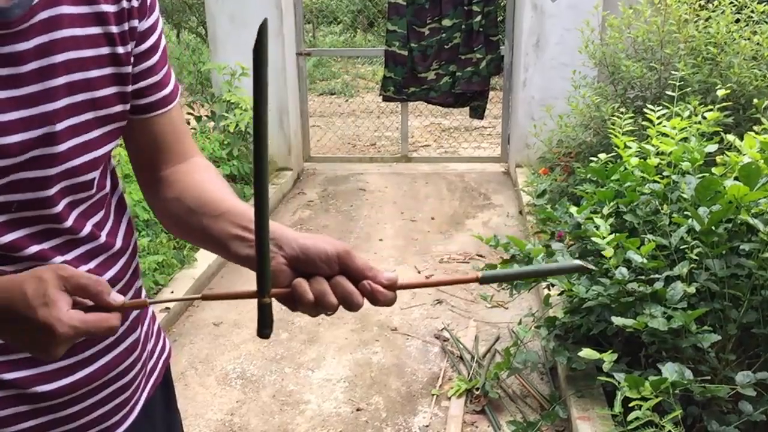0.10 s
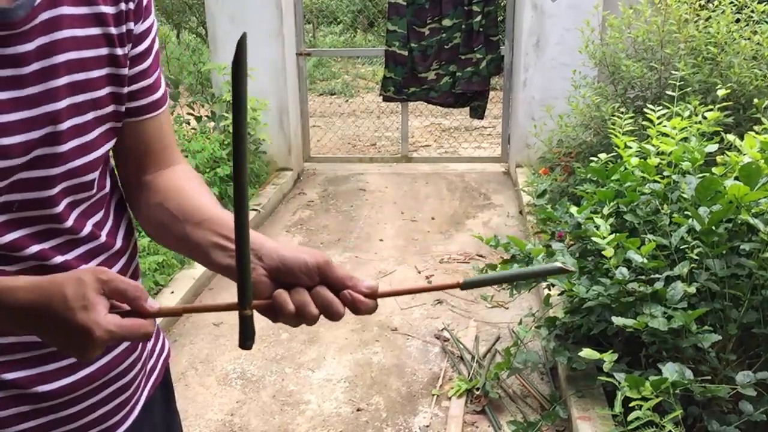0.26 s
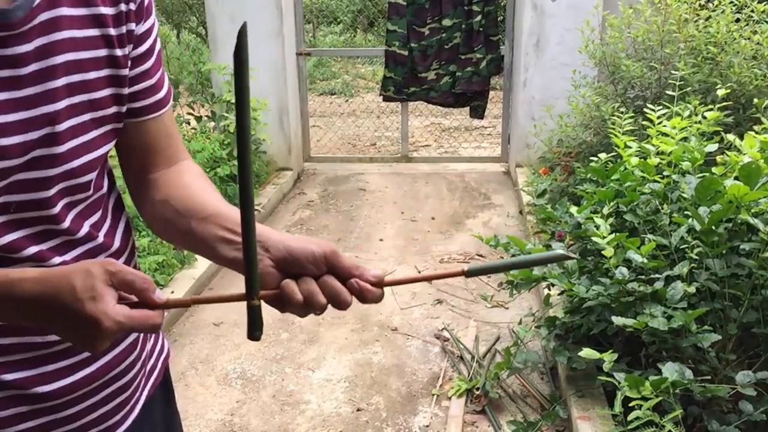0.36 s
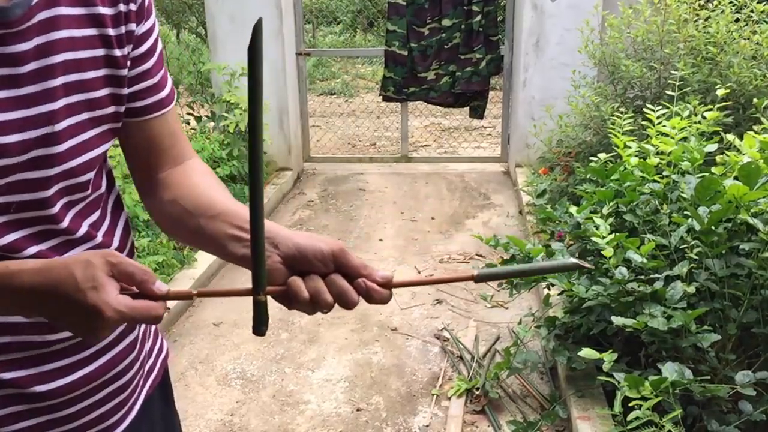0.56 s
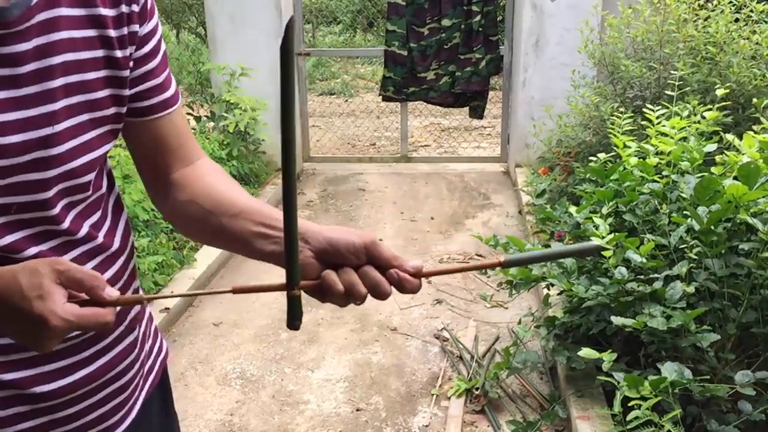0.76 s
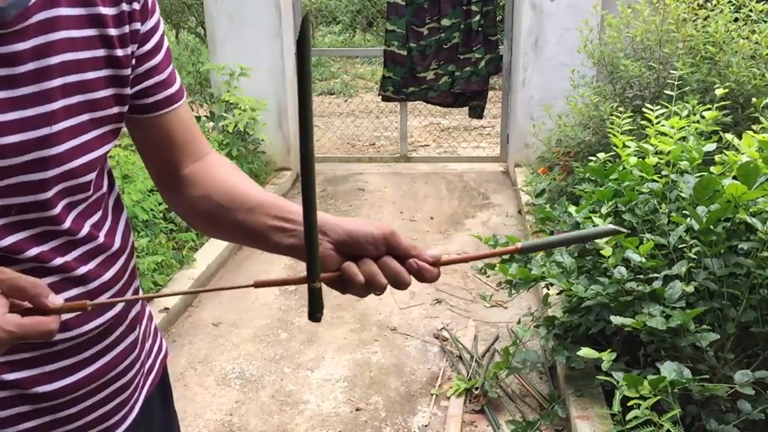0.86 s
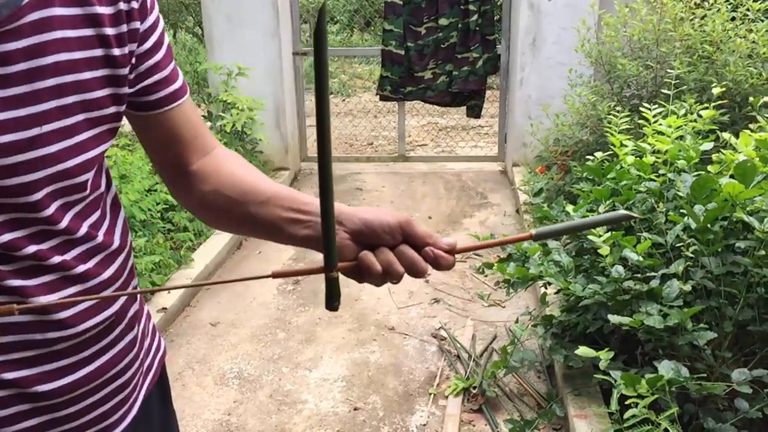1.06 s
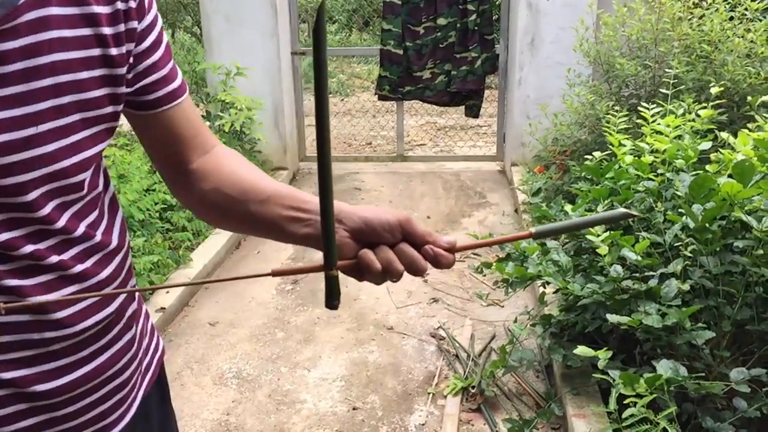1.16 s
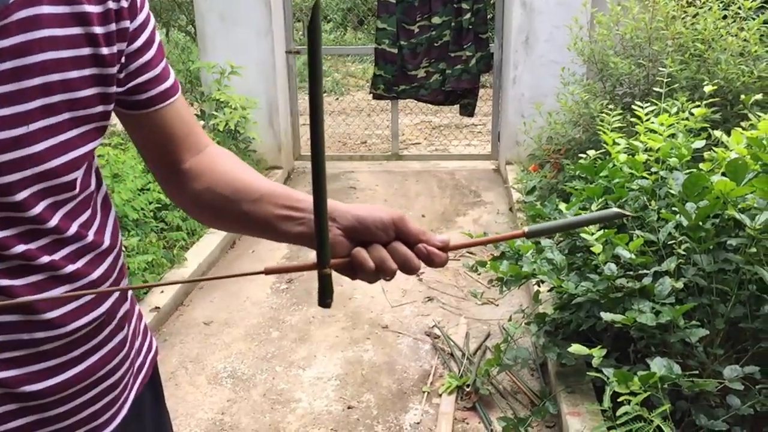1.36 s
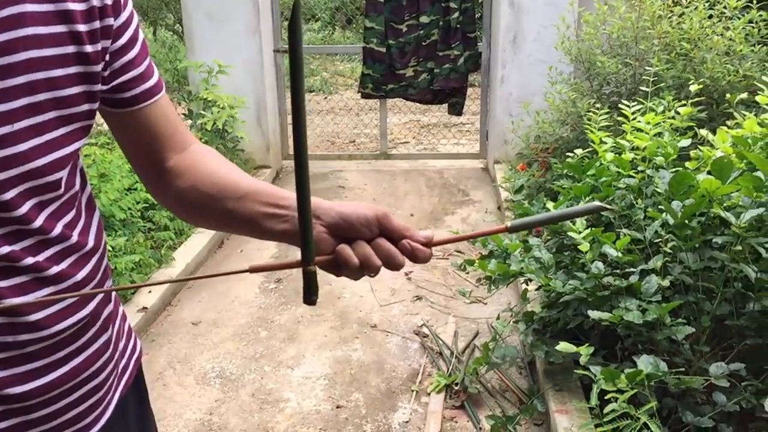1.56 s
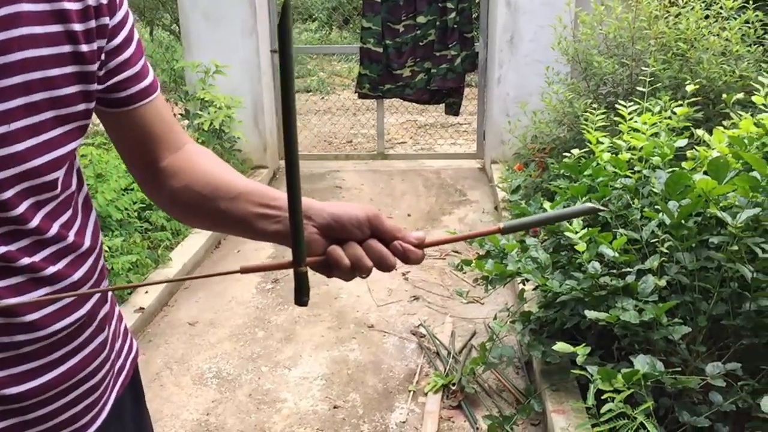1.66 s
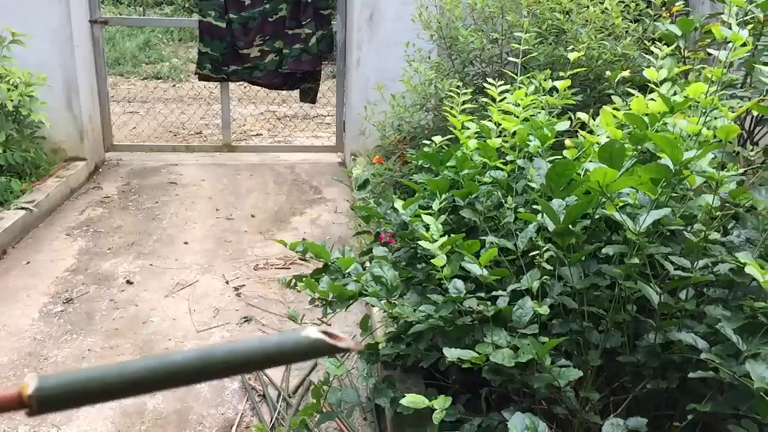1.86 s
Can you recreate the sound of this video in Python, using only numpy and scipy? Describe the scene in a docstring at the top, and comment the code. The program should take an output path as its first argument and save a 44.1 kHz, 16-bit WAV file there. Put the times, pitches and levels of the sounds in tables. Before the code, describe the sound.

In a walled garden, a stick scrapes briefly inside a bamboo pop gun, which lets off one loud, close, slightly distorted pop. A short echo follows, then faint rubbing as the plunger is withdrawn, over a thin, steady insect tone.

```python
"""A walled garden path, where a bamboo pop gun is fired once, close enough to overload the microphone.
The plunger rubs down the bore, then the pellet pops out with a puff of air and sets the cane
ringing. The pop slaps between the walls and scatters through the yard, and the plunger is drawn
back. Insects hold a thin beating tone, with fainter chirps above it, over soft outdoor air."""
import sys
import numpy as np
from scipy import signal
from scipy.fft import rfft, irfft
from scipy.io import wavfile

SR = 44100
rng = np.random.default_rng(int(sys.argv[2]) if len(sys.argv) > 2 else 0)


def wav_record(signal):
    """Record a signal, one row per channel, as 16-bit PCM in the file named by sys.argv[1]."""
    frames = np.transpose(np.atleast_2d(signal))
    bounded = np.clip(frames, -1, 1)
    # unit amplitude maps onto the largest positive 16-bit level
    quanta = np.round(bounded * 32767).astype(np.int16)
    wavfile.write(sys.argv[1], SR, quanta)


N = 83790
TIME = np.arange(N) / SR
BIN_HZ = np.arange(N // 2 + 1) * SR / N
POP_S = 0.2346


# Air and cane ringing as the pellet leaves. Each row: pitch in Hz, level in dB, t60 in seconds.
BORE_MODES = [(343.4, 1, 0.038), (440.5, 0.5, 0.039), (585, 4.5, 0.023), (685, -3, .025),
              (778.5, -3, 0.022), (926, 3, .026), (1090, 4.5, 0.023), (1253, 1, .03), (1608, -1, 0.031),
              (2152, -4, 0.043), (2820, -11.5, 0.029), (3710, -8, .016), (4502, -2, 0.011)]
# Colour of the escaping air. Each row: frequency in Hz, relative level in dB.
CRACK_COLOUR = [(150, -27.5), (400, 3), (1200, -1.5), (2500, 6), (5000, -14.5), (9000, -28)]

def pop():
    """The pressure release snaps, cracks and sets the bore ringing."""
    age = TIME - POP_S
    rings = sum((-1) ** k * from_db(db) * np.sin(2 * np.pi * hz * age) * decay(POP_S, t60)
                for k, (hz, db, t60) in enumerate(BORE_MODES))
    white = rng.standard_normal(N)
    bright = rms_one(white - lowpass(white, hz=1000, order=1))
    snap = from_db(10) * bright * decay(POP_S, t60=0.0018)
    crack = from_db(1.5) * noise(CRACK_COLOUR) * decay(POP_S, t60=0.0097)
    return rings + snap + crack


def puff():
    """The puff of air just behind the pop: a low thump that drops in pitch as it dies."""
    start = POP_S + 0.0055
    start_hz, end_hz, sag_s = 115, 27, 0.007
    age = np.maximum(TIME - start, 0)
    hz = end_hz + (start_hz - end_hz) * np.exp(-age / sag_s)
    return from_db(-11) * tone(hz * (age > 0)) * decay(start, t60=0.16)


# The plunger's stroke, pushed in and then drawn out. Each row: time in seconds, level in dB.
RUB_FADER = [(0, -52), (.035, -51.5), (.055, -48), (.16, -43.5), (.22, -38), (.25, -72), (.72, -64.5),
             (.82, -48), (.89, -54), (1.0, -48), (1.1, -58), (1.4, -69.5), (1.73, -62.5), (1.78, -55),
             (1.82, -55), (1.83, -66.5)]
# Colour of the rubbing. Each row: frequency in Hz, relative level in dB.
RUB_COLOUR = [(300, -15.5), (1000, -9), (1800, -1), (2400, 4), (3200, 5), (4000, -7), (4600, -2.5),
              (5500, -3), (7200, -5.5), (8500, -4), (9500, -8)]

def plunger():
    """The stick rubs grainily along the bore."""
    friction = rms_one(noise(RUB_COLOUR) * from_db(drift(rate=210)))  # about 1 dB of grain
    return ride(RUB_FADER) * friction


# A tick, the rush, a last tick. Each row: start in seconds, level in dB, t60 in seconds.
TICK_RUSH_CUES = [(.191, -33, 0.059), (0.212, -32, .3), (1.822, -58, .012)]
# Their shared colour. Each row: frequency in Hz, relative level in dB.
TICK_RUSH_COLOUR = [(100, -13.5), (400, -0.5), (1100, 0), (1700, -7.5), (2400, -33), (9000, -20.5)]

def ticks_and_rush():
    """Two faint ticks, and a soft low-mid rush of noise starting just before the pop."""
    envelope = sum(from_db(db) * decay(start, t60) for start, db, t60 in TICK_RUSH_CUES)
    return noise(TICK_RUSH_COLOUR) * envelope


# The squeak, then the hit. Each row: peak time in seconds, length in seconds, centre in Hz,
# bandwidth in Hz, level in dB.
CONTACT_CUES = [(0.058, 0.032, 6500, 1100, -45.5), (0.2697, .003, 6525, 2000, -25)]

def contacts():
    """The stick squeaks and the pellet hits: two brief, narrow bursts of treble."""
    return sum(from_db(db) * band_noise(hz, width_hz) * swell(peak, length)
               for peak, length, hz, width_hz, db in CONTACT_CUES)


# Slaps off the ground and walls. Each row: delay in seconds, level in dB, treble cutoff in Hz.
SLAP_TAPS = [(.0089, -8, 8000), (0.0171, -8.5, 4000), (.0267, -21.5, 3060), (.036, -28, 5050),
             (0.0507, -10.5, 1950)]

def slaps(shot):
    """Hard surfaces throw the shot back late and duller, with little bass."""
    thin = signal.sosfilt(signal.butter(2, 280, "high", fs=SR, output="sos"), shot)
    return sum(from_db(db) * lowpass(np.interp(TIME - delay, TIME, thin, left=0), hz)
               for delay, db, hz in SLAP_TAPS)


# The yard's diffuse wash. Each row: frequency in Hz, relative level in dB, t60 in seconds.
YARD_REVERB = [(60.04, -19, .22), (180, -15, 0.6), (348, -1, .42), (654, 1, .5), (1107, 2, 0.52),
               (1690, -2.5, 0.61), (2720, -8, 0.71), (4300, -14, 0.53), (6100, -18, .4), (9000, -27, .38)]
# Colour of the dull return from far away. Each row: frequency in Hz, relative level in dB.
FAR_COLOUR = [(60, -33.5), (200, -19), (400, -5.5), (1000, 0.5), (1700, -9), (3500, -22.5), (9000, -45)]

def scatter():
    """The pop's tail: early scatter off paving and bushes, the yard's wash and ring, a far return."""
    wash = rfft(noise(YARD_REVERB))
    edges_hz = np.geomspace(20, SR / 2, 20)
    yard = 0
    for low, high in zip(edges_hz, edges_hz[1:]):
        band = irfft(wash * (BIN_HZ >= low) * (BIN_HZ < high), N)
        t60 = at_hz(YARD_REVERB, np.sqrt(low * high), column=2)
        yard += band * decay(POP_S, t60)
    near = from_db(-10.5) * noise(CRACK_COLOUR) * decay(POP_S, t60=0.13)
    far = from_db(-34) * noise(FAR_COLOUR) * decay(POP_S, t60=1.47)
    # A hollow note rings between the walls.
    ring = from_db(-22.5) * band_noise(hz=1166, width_hz=90) * decay(POP_S, t60=0.62)
    bloom = 1 - np.exp(-np.maximum(TIME - POP_S, 0) / 0.011)
    return near + bloom * (from_db(-14) * yard + ring + far)


# Returns off bushes and the gate wall. Each row: peak time in seconds, length in seconds, level in dB.
RETURN_CUES = [(0.368, 0.024, -33.5), (0.417, 0.02, -28.5), (.66, .1, -48)]
# Colour of those returns. Each row: frequency in Hz, relative level in dB.
RETURN_COLOUR = [(150, -24), (330, -5), (700, 1), (1150, 3), (1700, -13), (3000, -17.5), (5000, -26.5),
                 (9000, -35)]

def late_returns():
    """Late reflections, smeared by leaves and railings into soft swells of noise."""
    swells = sum(from_db(db) * swell(peak, length) for peak, length, db in RETURN_CUES)
    return noise(RETURN_COLOUR) * swells


# The droning insects. Each row: pitch in Hz, relative level in dB, pitch wander in Hz.
INSECT_VOICES = [(2433, -6, 19), (2500, 1, 17.48), (2543, -2.5, 26.32), (2569, -4, 30.1)]
# Level ride of the whole chorus. Each row: time in seconds, level in dB.
INSECT_FADER = [(0, -36.5), (.08, -41.5), (.19, -38), (.25, -45.5), (.55, -43), (.66, -39.5), (1.1, -39.5),
                (1.45, -39.5), (1.78, -39.5), (1.83, -45.5), (1.9, -46)]

def insects():
    """Insects waver around nearly one pitch, so their tones beat against each other."""
    flutter_db = 2.0
    chorus = 0
    for hz, db, wander_hz in INSECT_VOICES:
        voice = tone(hz + wander_hz * drift(rate=25))
        chorus += from_db(db + flutter_db * drift(rate=15)) * voice
    return ride(INSECT_FADER) * rms_one(chorus)


# The chirping insects. Each row: pitch in Hz, level in dB, pulses per second, start and end in seconds.
CHIRP_VOICES = [(5160, -63, 25, .3, 1.83), (5440, -69, 28, 1.15, 1.83)]

def chirpers():
    """Faint, higher insects pulse in a nearly even rhythm, with uneven strength."""
    wander_hz, uneven_db = 18, 2.5
    chorus = 0
    for hz, db, pulse_rate, start, end in CHIRP_VOICES:
        pace = pulse_rate * (1 + 0.12 * drift(rate=8))
        pulses = tone(pace / 2) ** 2  # squaring gives two pulses a cycle
        voice = tone(hz + wander_hz * drift(rate=25))
        fade = np.clip(np.minimum(TIME - start, end - TIME) / 0.05, 0, 1)
        chorus += from_db(db + uneven_db * drift(rate=10)) * pulses * voice * fade
    return chorus


# Colour of the outdoor air. Each row: frequency in Hz, relative level in dB.
AIR_COLOUR = [(25, 1), (60, -5.5), (120, -7.5), (250, -16), (550, -16), (1050, -12.5), (1550, -22),
              (3000, -22.5), (5000, -31.5), (9000, -42)]
# Level ride of the air. Each row: time in seconds, level in dB.
AIR_FADER = [(0, -53.5), (.22, -55), (.27, -51), (.56, -58.5), (.72, -52), (1.9, -53.5)]

def air():
    """A faint bed of outdoor air whose level dips briefly after the shot."""
    return ride(AIR_FADER) * noise(AIR_COLOUR)


def from_db(db):
    """Decibels to gain."""
    return 10 ** (np.asarray(db) / 20)


def rms_one(x):
    """Scale to unit rms."""
    return x / np.sqrt(np.mean(x ** 2) + 1e-20)


def ride(fader):
    """Gain gliding through points of time in seconds and level in dB."""
    return from_db(np.interp(TIME, *np.transpose(fader)))


def decay(start, t60):
    """Sudden onset, then a fall of 60 dB every t60 seconds."""
    return (TIME >= start) * np.exp(-np.log(1000) * np.maximum(TIME - start, 0) / t60)


def swell(peak, length):
    """A bell-shaped rise and fall, timed in seconds."""
    return np.exp(-(2 * (TIME - peak) / length) ** 2)


def at_hz(rows, hz, column=1):
    """Read a column of a table on a log-frequency axis."""
    rows = np.array(rows)
    return np.interp(np.log(hz + 1e-9), np.log(rows[:, 0]), rows[:, column])


def lowpass(x, hz, order=2):
    """Butterworth low-pass."""
    return signal.sosfilt(signal.butter(order, hz, fs=SR, output="sos"), x)


def tone(hz):
    """A sine that follows a moving pitch."""
    return np.sin(2 * np.pi * np.cumsum(hz) / SR)


def shaped_noise(gains):
    """Noise with a gain for each frequency bin, scaled to rms 1."""
    return rms_one(irfft(rfft(rng.standard_normal(N)) * gains, N))


def noise(colour):
    """Noise of a given colour above 20 Hz, rms 1."""
    return shaped_noise(from_db(at_hz(colour, BIN_HZ)) * (BIN_HZ > 20))


def band_noise(hz, width_hz):
    """Noise in one resonance, rms 1."""
    return shaped_noise(1 / (1 + (2 * (BIN_HZ - hz) / width_hz) ** 2))


def drift(rate):
    """A random wobble, mostly slower than rate in Hz, rms 1."""
    return shaped_noise(1 / (1 + (BIN_HZ / rate) ** 2))


def scene():
    """Gun, yard, insects and air at one microphone."""
    shot = pop()
    foreground = shot + slaps(shot) + puff() + scatter() + plunger() + ticks_and_rush() + contacts()
    return (foreground + insects() + chirpers() + air() + late_returns())[None]


def record(dry):
    """The microphone loses the top treble, the shot clips hard, and the highest fizz is cut."""
    mic_top_hz, cutoff_hz = 9400, 16800
    heard = signal.sosfilt(signal.ellip(8, 0.3, 70, mic_top_hz, fs=SR, output="sos"), dry)
    clipped = np.clip(heard, -1, 1)
    return signal.sosfilt(signal.cheby2(16, 80, cutoff_hz, fs=SR, output="sos"), clipped)


dry = scene()
out = record(dry)
wav_record(out)
```